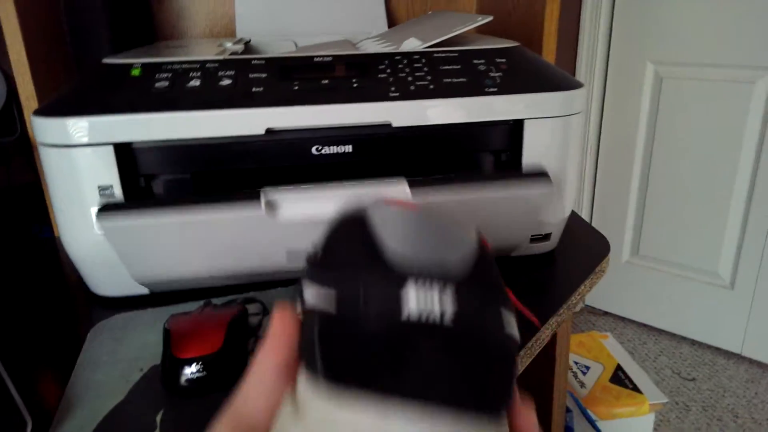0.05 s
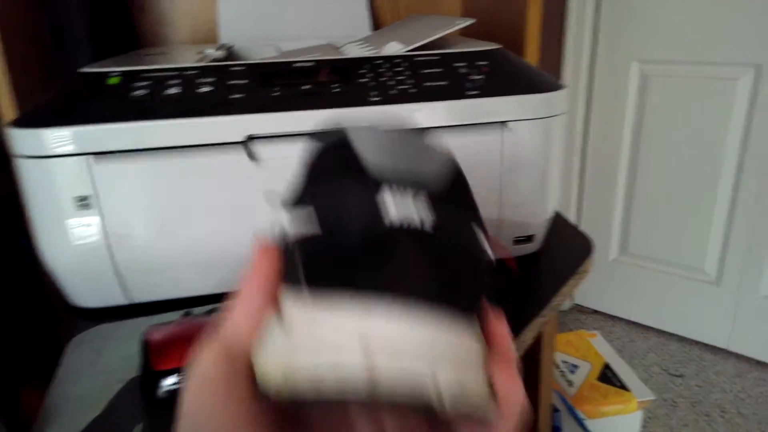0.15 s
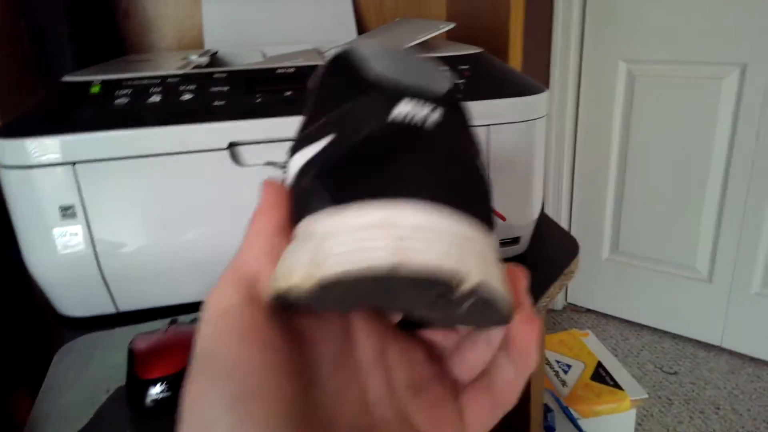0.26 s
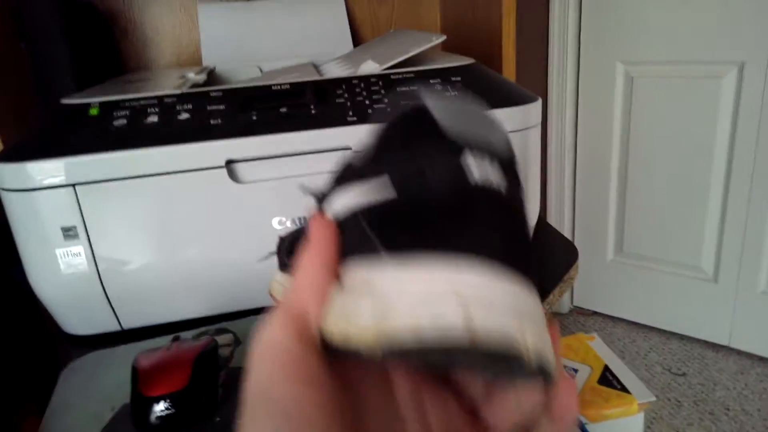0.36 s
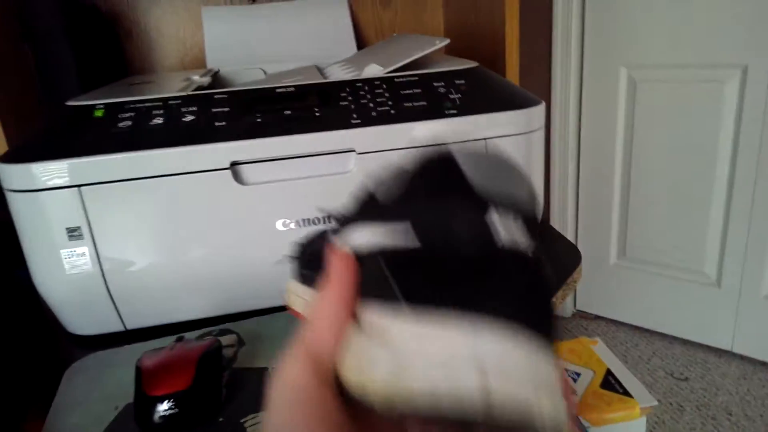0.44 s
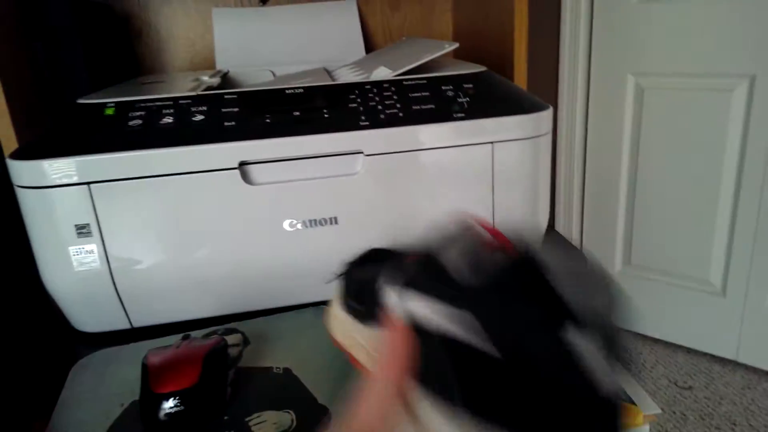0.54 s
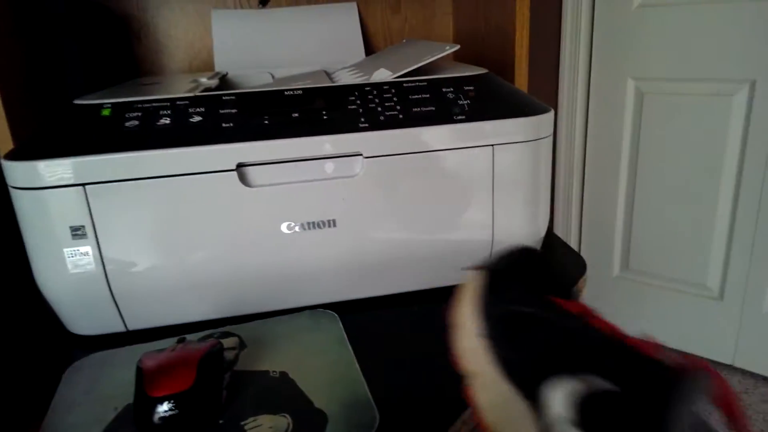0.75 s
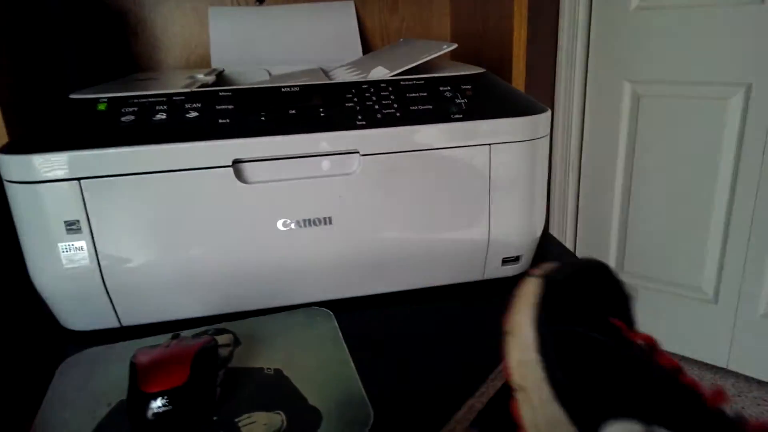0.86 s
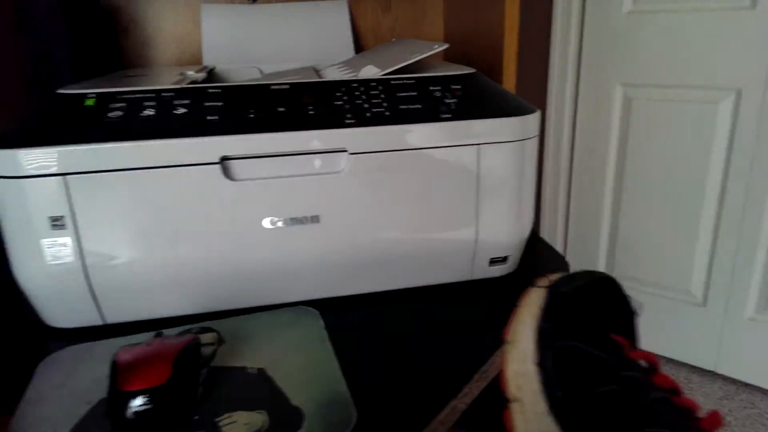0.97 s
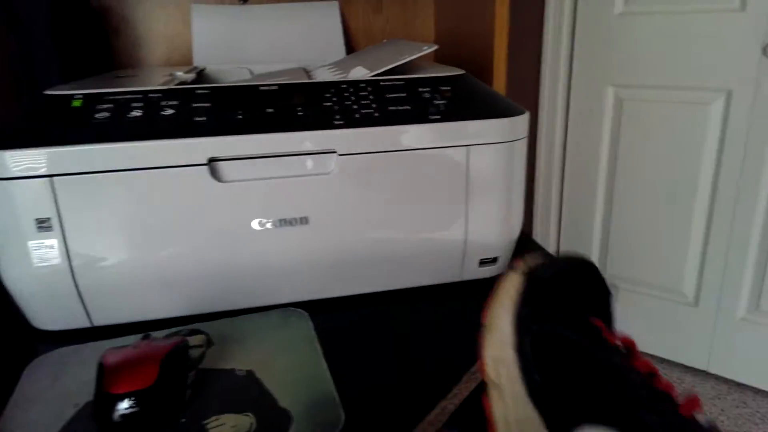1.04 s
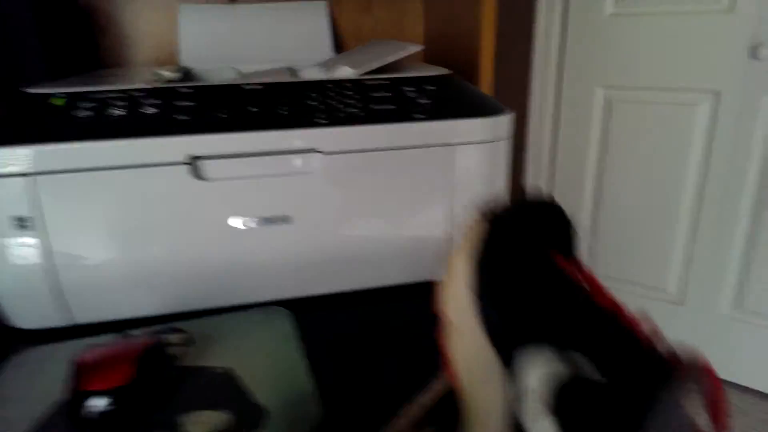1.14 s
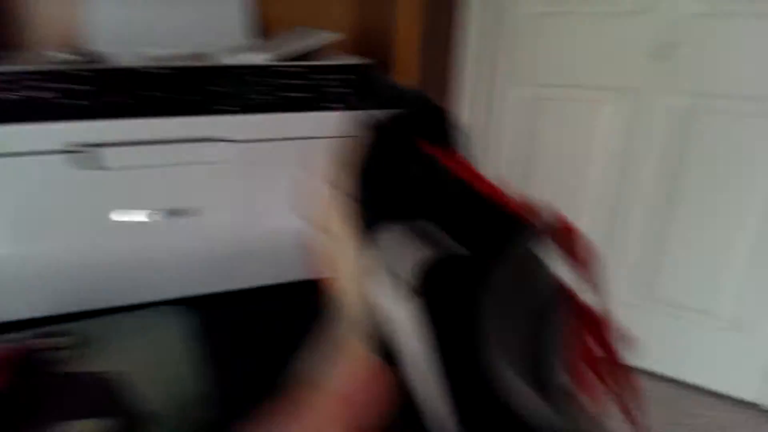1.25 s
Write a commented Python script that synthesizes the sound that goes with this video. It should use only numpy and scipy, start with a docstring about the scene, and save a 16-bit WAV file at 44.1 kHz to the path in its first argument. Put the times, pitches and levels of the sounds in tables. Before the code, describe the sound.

In a small room, a printer's plastic tray snaps shut with a loud clack after soft rustling. Then come a faint plastic tick and a muffled bump. A fan hums faintly, and the close sound sits mostly left.

```python
"""Soft rustles and a slight bump sound over a faint fan hum in a small room. Then a shoe pushes the
plastic front tray of a printer shut: the catch scrapes in stick-slip friction, the tray slams home
and the housing booms in its damped modes. A light plastic tick and a dull bump follow.
The close microphone hears nearly everything on its left channel."""
import sys
import numpy as np
from scipy import signal
from scipy.fft import rfft, irfft, next_fast_len
from scipy.io import wavfile
from scipy.ndimage import map_coordinates

SR = 44100
rng = np.random.default_rng(int(sys.argv[2]) if len(sys.argv) > 2 else 0)


def generate_wav(signal):
    """Clip the signal to [-1, 1] and save it as 16-bit WAV at the path in sys.argv[1]."""
    frames = np.transpose(np.atleast_2d(signal))
    scaled = np.clip(frames, -1, 1) * 32767
    pcm = np.round(scaled).astype(np.int16)
    wavfile.write(sys.argv[1], SR, pcm)


N = 57330


def amp(db):
    """Amplitude ratio of a level in decibels."""
    return 10 ** (np.asarray(db) / 20)


def unit(x):
    """Normalisation to rms 1."""
    return x / np.sqrt(np.mean(x ** 2) + 1e-20)


def along(points, hz):
    """Interpolation of (f/Hz, value) points on a logarithmic frequency axis."""
    f, values = np.transpose(points)
    return np.interp(np.log(hz + 1), np.log(f + 1), values)


def filtered(x, response):
    """Linear filtering: the spectrum times a frequency response."""
    size = next_fast_len(N + SR // 2)
    return irfft(rfft(x, size) * response(np.fft.rfftfreq(size, 1 / SR)), size)[..., :N]


def noise(spectrum):
    """Spectral shaping: noise of rms 1 with the given relative density (f/Hz, level/dB)."""
    return unit(filtered(rng.standard_normal(N), lambda hz: amp(along(spectrum, hz))))


def since(onset):
    """Seconds after the onset, zero before it."""
    return np.maximum(np.arange(N) / SR - onset, 0)


def burst(onset, spectrum, decay, rise_s):
    """Modal overlap: dense modes merge into noise that fades by the decay curve (f/Hz, T60/s)."""
    hz, t, bands = signal.stft(noise(spectrum), SR, nperseg=128)
    fade = amp(-60 * np.maximum(t - onset, 0) / along(decay, hz)[:, None])
    return signal.istft(bands * fade, SR)[1][:N] * (1 - np.exp(-since(onset) / rise_s))


def ring(onset, modes, rise_s):
    """Free vibration: a struck body sounds as a sum of damped sinusoids."""
    t = since(onset)
    tones = np.zeros(N)
    for k, (hz, db, t60) in enumerate(modes):
        gain = (-1) ** k * amp(db + rng.normal(0, 1))
        tones += gain * amp(-60 * t / t60) * np.sin(2 * np.pi * hz * t)
    return tones * (1 - np.exp(-t / rise_s))


# Reverberation time of the room: f/Hz, T60/s
ROOM_DECAY = [(130, .36), (300, 0.37), (800, 0.29), (3000, 0.37), (8000, .32), (10000, 0.37), (12000, 0.25),
              (15000, .18)]
# Colouring by the room: f/Hz, level/dB
ROOM_RESPONSE = [(60, -7), (200, 1.5), (800, 0.5), (3000, -3), (7000, -1), (10000, -9.5), (15000, -2)]
def room(onset, spectrum):
    """Reverberation: the diffuse field builds up from 6 ms after a contact."""
    coloured = [(hz, db + along(ROOM_RESPONSE, hz)) for hz, db in spectrum]
    return amp(-21.5) * burst(onset + .006, coloured, ROOM_DECAY, rise_s=.009)


def contact(onset, spectrum, decay):
    """Impulsive excitation: a broadband crack of plastic, direct and reverberant."""
    return burst(onset, spectrum, decay, rise_s=.00016) + room(onset, spectrum)


# Tones of the fan: f/Hz, level/dB
FAN_TONES = [(129.2, -74.5), (209.9, -77.5), (306.8, -88), (629.8, -82), (1044, -92.5)]
# Rumble of the room: f/Hz, level/dB
RUMBLE_SPECTRUM = [(12, -32.5), (20, -1), (65, -20), (81, -37.5), (130, -11.5), (176, -38), (215, -15.5),
                   (268, -47), (300, -40), (620, -37.5), (674, -43.5), (15800, -54)]
def fan():
    """Random modulation: the hum drifts in level and phase over the room's low rumble."""
    t = since(0)
    def drift():
        return map_coordinates(rng.standard_normal(N // 1000), [t * 8], mode="nearest")
    hum = sum(amp(db + 1.5 * drift()) * np.sqrt(2) * np.sin(2 * np.pi * hz * t + .4 * drift())
              for hz, db in FAN_TONES)
    return hum + amp(-62.5) * noise(RUMBLE_SPECTRUM)


# Rustles: centre t/s, half-width t/s, level/dB, cloth level/dB relative to the rub
RUSTLE_SWELLS = [(.055, 0.0093, -56.5, -20), (.07, 0.049, -68, -1), (.185, .025, -68.5, -13.5),
                 (0.522, 0.03, -61, -14), (.61, 0.034, -70.5, -5.5), (.78, .04, -78.5, 4.5),
                 (1.17, .05, -81.5, -1.5)]
# Dull rub and cloth hiss: f/Hz, level/dB
RUB_SPECTRUM = [(60, -9.5), (150, -1), (600, 0.5), (1000, -3), (2000, -13.5), (5000, -20.5), (15000, -38.5)]
CLOTH_SPECTRUM = [(300, -22.5), (2000, -2), (8000, -4), (10400, 4), (12000, -5), (16000, -15)]
def handling():
    """Friction noise: hand and shoe rub in short Gaussian swells."""
    out = np.zeros(N)
    for centre, half_width, db, cloth_db in RUSTLE_SWELLS:
        swell = np.exp(-.5 * ((since(0) - centre) / half_width) ** 2)
        out += amp(db) * swell * (noise(RUB_SPECTRUM) + amp(cloth_db) * noise(CLOTH_SPECTRUM))
    return out


# Bumps against the desk: t/s, level/dB, click level/dB
DESK_BUMPS = [(.045, -48.5, -74), (.6335, -36, -44)]
# Modes of the desk: f/Hz, level/dB, T60/s
DESK_MODES = [(129, 1.5, 0.27), (188, -6.5, .25), (450, -16.5, 0.15)]
# Thud and click: f/Hz, level/dB
THUD_SPECTRUM = [(40, -1.5), (170, 1), (450, -16), (1000, -25), (4200, -40.5), (6000, -48), (15000, -53)]
CLICK_SPECTRUM = [(200, 17.5), (1000, -5), (4300, -3), (5500, -21), (15000, -42)]
# Damping of the click: f/Hz, T60/s
CLICK_DECAY = [(500, 0.028), (4000, 0.0092)]
def bumps():
    """Cushioned impact: a small click and a padded thud, then the desk's low modes swell."""
    out = np.zeros(N)
    for onset, db, click_db in DESK_BUMPS:
        thud = burst(onset, THUD_SPECTRUM, [(100, .28), (600, .15), (4000, .15)], rise_s=.0042)
        click = burst(onset, CLICK_SPECTRUM, CLICK_DECAY, rise_s=.0003)
        desk = ring(onset, DESK_MODES, rise_s=.013)
        out += amp(db) * (desk + amp(-9.5) * thud) + amp(click_db) * click
    return out


# Light contacts of plastic: t/s, level/dB
TICK_CONTACTS = [(.4962, -49), (.501, -58)]
# Noise of a tick: f/Hz, level/dB
TICK_SPECTRUM = [(60, 3), (250, -17), (800, 1), (1300, -12), (2000, -7), (4000, -10), (6500, -10),
                 (10500, -14), (13000, -13.5), (15800, -19)]
# Modes of the plastic: f/Hz, level/dB, T60/s
HOLLOW_MODES = [(258, 3, 0.16), (410, -3.5, 0.26), (736, 2, 0.11)]
def ticks():
    """Impact and resonance: a light double tick sets the plastic ringing hollowly."""
    out = np.zeros(N)
    for onset, db in TICK_CONTACTS:
        tick = contact(onset, TICK_SPECTRUM, [(400, .098), (2000, .07), (10000, .052)])
        out += amp(db) * (tick + amp(-5) * ring(onset, HOLLOW_MODES, rise_s=.0044))
    return out


# Slips of the catch: t/s, level/dB
CATCH_SLIPS = [(.207, -57), (0.2138, -35.5), (.2168, -35.5), (.2215, -31.5), (.226, -36.5), (.232, -44)]
# Noise of a slip: f/Hz, level/dB
SLIP_SPECTRUM = [(50, -29), (130, -8.5), (430, -10.5), (700, -3.5), (1300, -14.5), (1650, -12.5),
                 (4400, -11), (5500, -13), (10600, -7.5), (13000, -19.5), (15800, -30.5)]
# Modes of the catch: f/Hz, level/dB, T60/s
CATCH_RESONANCES = [(305, -3.5, 0.075), (666, 1, .1), (770, -9.5, .1), (2640, -7.5, 0.18),
                    (4390, 0.5, 0.069)]
def catch():
    """Stick-slip friction: the catch crosses its lip in quick slips, each exciting its modes."""
    out = np.zeros(N)
    for onset, db in CATCH_SLIPS:
        scrape = contact(onset, SLIP_SPECTRUM, [(300, .08), (10000, .05)])
        out += amp(db) * (scrape + amp(-9.5) * ring(onset, CATCH_RESONANCES, rise_s=.001))
    return out


def thin_ring(onset, centre_hz=10450, width_hz=130, t60=.71):
    """Exponential decay of narrow-band noise: a thin high ring lingers after the slam."""
    t = since(onset)
    band = filtered(rng.standard_normal(N), lambda hz: np.exp(-.5 * ((hz - centre_hz) / width_hz) ** 2))
    return amp(-57) * unit(band) * amp(-60 * t / t60) * (t > 0)


# Contacts of the tray as it seats: t/s, level/dB
TRAY_CONTACTS = [(0.2416, -16.5), (0.2456, -8.5), (0.2464, -9), (0.2519, -17)]
# Crack of each contact: f/Hz, level/dB
CRACK_SPECTRUM = [(30, -25), (90, -18.5), (135, -9), (250, -5.5), (350, -10), (450, -6.5), (750, -1.5),
                  (1200, -11.5), (1650, -10), (1950, -14), (2600, -12), (4500, -11.5), (6000, -14.5),
                  (10000, -6.5), (13000, -17), (15800, -19.5)]
# Damping of the crack: f/Hz, T60/s
CRACK_DECAY = [(60, 0.21), (200, 0.15), (700, 0.059), (2500, .04), (10000, .03)]
# Modes of the housing: f/Hz, level/dB, T60/s
HOUSING_MODES = [(132.6, 3.5, .115), (152, -11, 0.03), (183, -7.5, .14), (228, -1, .08), (248.3, 3, 0.18),
                 (295, -5, .11), (430.3, 2, .085), (524, -7, 0.24), (670, -5, .07), (723, 8, .075),
                 (893, -3, 0.09), (1605, -8.5, 0.096), (2528, -13.5, 0.12), (4070, -12.5, 0.15)]
def slam(boom_s):
    """Multiple impact: the tray hits four points in about 10 ms; the housing booms, loose panels buzz."""
    cracks = sum(amp(db) * contact(onset, CRACK_SPECTRUM, CRACK_DECAY) for onset, db in TRAY_CONTACTS)
    buzz_spectrum = [(100, -19), (700, 3.5), (3000, .5), (11000, -4.5), (15000, -10.5)]
    buzz = burst(.255, buzz_spectrum, [(500, .14), (10000, .15)], rise_s=.001)
    boom = ring(boom_s, HOUSING_MODES, rise_s=.0022)
    return cracks + amp(-20.5) * buzz + amp(-19) * boom


def scene():
    """Superposition: all sources add, 20 dB weaker on the right than on the left."""
    boom_s = .2428
    left = catch() + slam(boom_s) + thin_ring(boom_s) + ticks() + bumps() + handling() + fan()
    return np.array([left, amp(-20) * left])


def record(dry):
    """Transduction: the microphone resonates faintly in the treble, hisses, clips and limits the band."""
    ring_hz, width_hz, cutoff_hz = 10400, 160, 15900
    resonant = filtered(dry, lambda f: 1 + .6j * f * width_hz / (ring_hz**2 - f**2 + 1j * f * width_hz))
    hiss_spectrum = [(20, 26.5), (100, 17), (500, 4.5), (3000, 0), (10500, .5), (15500, -5.5)]
    hiss = np.array([noise(hiss_spectrum) for _ in range(2)])
    clipped = np.clip(resonant + amp(-74.5) * hiss, -.85, .85)
    return filtered(clipped, lambda hz: np.clip((cutoff_hz - hz) / 600 + .5, 0, 1))


dry = scene()
out = record(dry)
generate_wav(out)
```